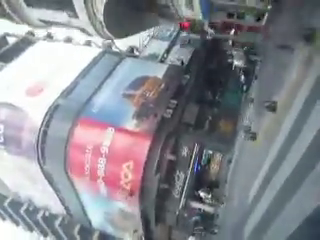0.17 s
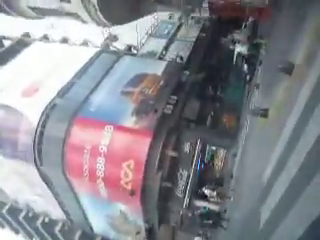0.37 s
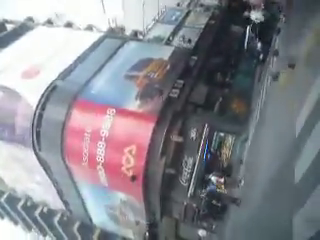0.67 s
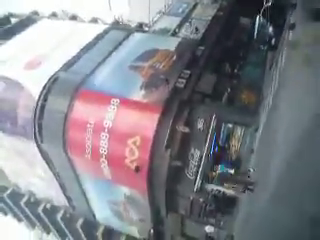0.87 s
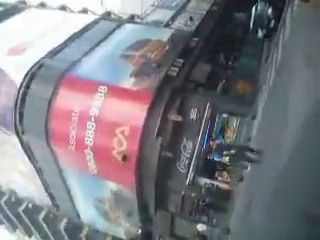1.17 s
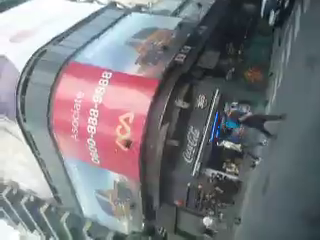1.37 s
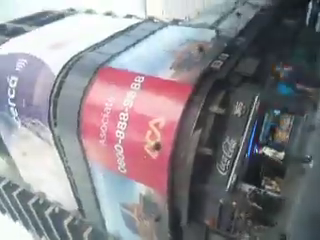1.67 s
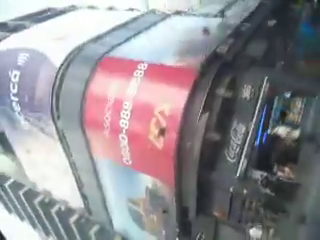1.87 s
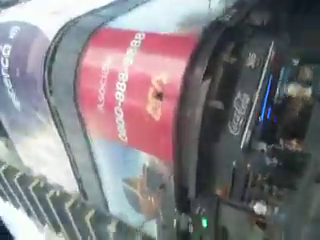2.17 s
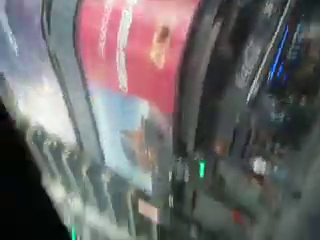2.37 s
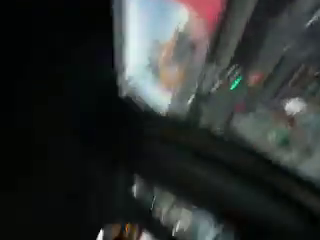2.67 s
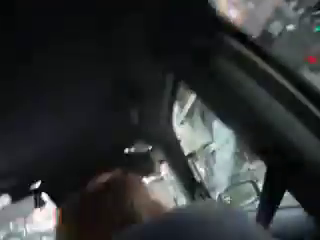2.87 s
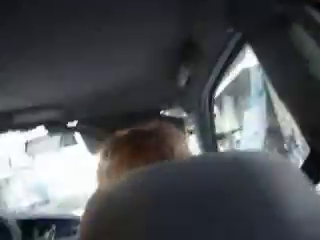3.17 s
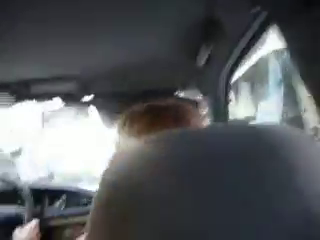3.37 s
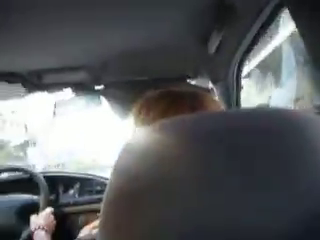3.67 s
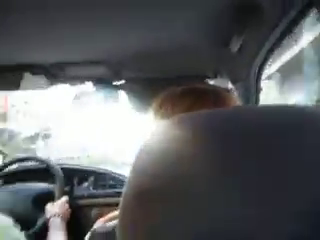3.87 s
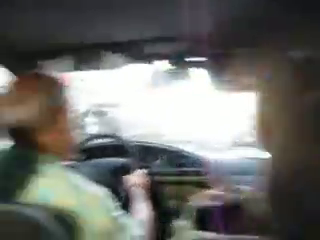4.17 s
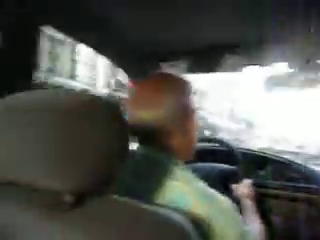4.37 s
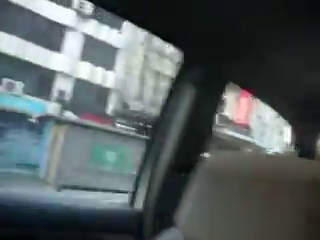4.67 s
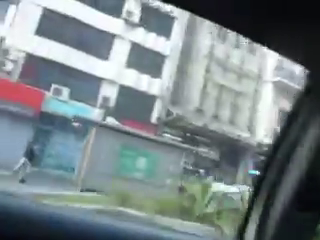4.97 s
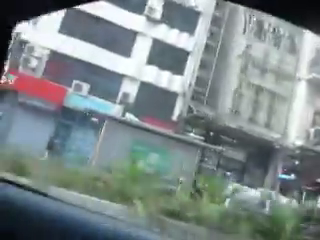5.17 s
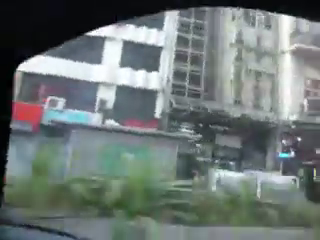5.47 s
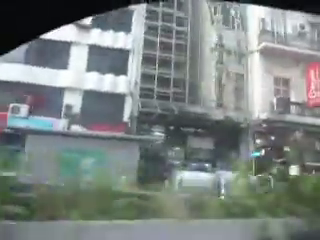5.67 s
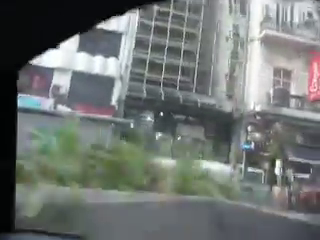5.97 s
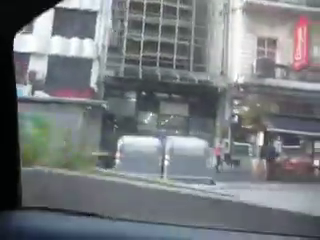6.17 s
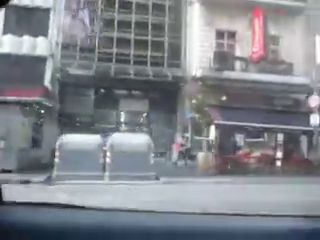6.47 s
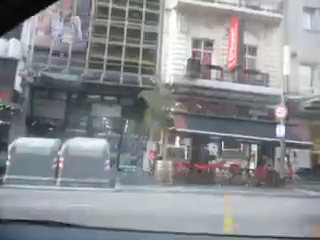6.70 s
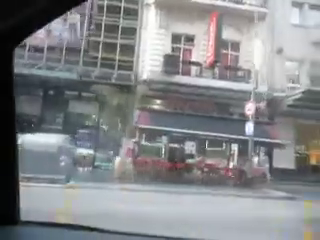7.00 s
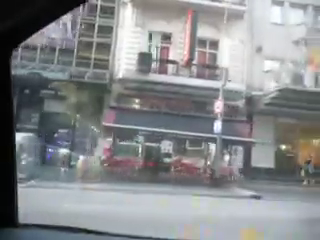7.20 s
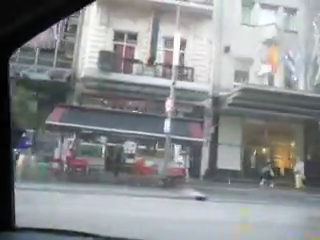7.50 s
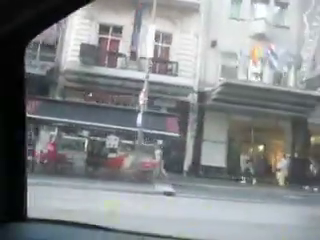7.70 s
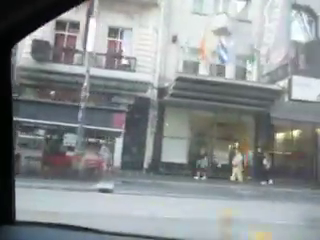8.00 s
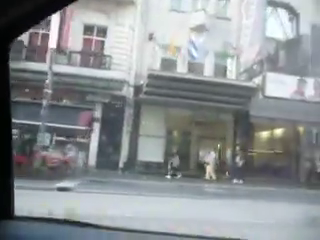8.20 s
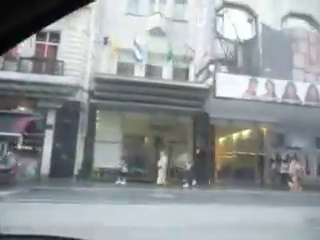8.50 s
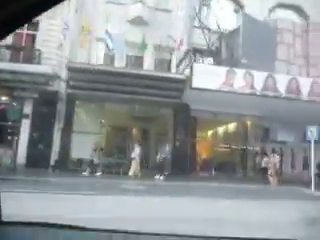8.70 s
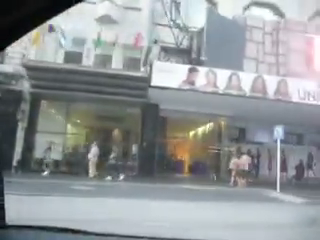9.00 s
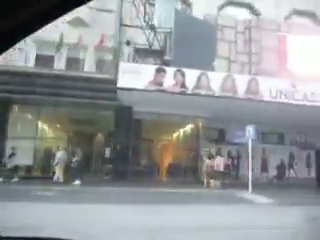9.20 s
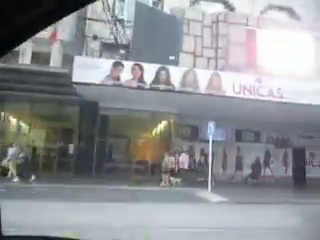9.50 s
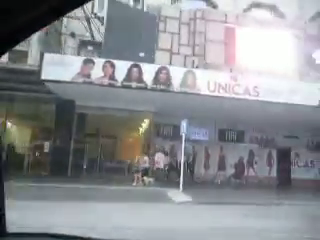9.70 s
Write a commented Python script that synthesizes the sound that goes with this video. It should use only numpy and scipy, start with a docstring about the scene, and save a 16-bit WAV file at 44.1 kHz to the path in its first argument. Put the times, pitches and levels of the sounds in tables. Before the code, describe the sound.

Inside a car on a city avenue, the engine booms up and eases, road rumbles, fingers rub the microphone, then bumps thud underneath.

```python
"""Back seat of a car rolling along a city avenue, heard by a small hand-held camera.
The engine booms up and eases off, built from sine waves at multiples of its firing rate.
Coloured noise makes the road's rumble, the tyres' rush and the wind; ringing tones make thuds and knocks.
The sound cuts out twice. Fingers rub and tap on the camera, mostly as it is swung to the other window."""
import sys
import numpy as np
from scipy import signal
from scipy.fft import rfft, irfft, next_fast_len
from scipy.io import wavfile
from scipy.ndimage import uniform_filter1d

SR = 44100
rng = np.random.default_rng(int(sys.argv[2]) if len(sys.argv) > 2 else 0)


def master(y):
    """Save y as 16-bit WAV."""
    cut = np.clip(np.atleast_2d(y).T, -1, 1)
    pcm = np.round(cut * 32767)  # scale
    wavfile.write(sys.argv[1], SR, pcm.astype(np.int16))


N = 434385


def from_db(db):
    """Turn decibels into a gain."""
    return 10 ** (np.asarray(db) / 20)


def rms_one(x):
    """Scale a sound to an rms (average strength) of 1."""
    return x / np.sqrt(np.mean(x ** 2) + 1e-20)


def in_time(rows):
    """Draw each column of a timed table as a curve with a value at every sample."""
    s, *columns = np.transpose(rows)
    return [np.interp(np.arange(N) / SR, s, column) for column in columns]


def swing(curve):
    """A level curve in dB, moved so that its mean is 0."""
    db, = in_time(curve)
    return db - db.mean()


def ramp(start_s, takes_s):
    """A smooth move from 0 to 1."""
    progress = np.clip((np.arange(N) / SR - start_s) / takes_s, 0, 1)
    return np.sin(np.pi / 2 * progress) ** 2


def drift(rate):
    """A random wander of spread 1, heading for a new value `rate` times a second."""
    knots = rng.standard_normal(2000)
    return rms_one(np.interp(np.arange(N) / SR * rate, np.arange(len(knots)), knots))


def bins(size):
    """Frequencies in the spectrum of that many samples, kept above zero."""
    return np.maximum(np.fft.rfftfreq(size, 1 / SR), 1)


def colour(x, spectrum):
    """Filter a sound by a curve of dB over pitch."""
    hz, db = np.transpose(spectrum)
    curve_db = np.interp(np.log(bins(len(x))), np.log(hz), db)
    return irfft(rfft(x) * from_db(curve_db), len(x))


def noise(spectrum):
    """Noise of the given colour, rms 1."""
    white = rng.standard_normal(next_fast_len(N))
    return rms_one(colour(white, spectrum)[:N])


def bell(hz, centre_hz, octaves):
    """A bell-shaped weight over pitch."""
    return np.exp(-(np.log2(hz / centre_hz) / octaves) ** 2 / 4)


def hump(x, centre_hz, octaves):
    """Keep a bell-shaped range of pitch."""
    return irfft(rfft(x) * bell(bins(len(x)), centre_hz, octaves), len(x))


def soften(x, hz):
    """Gently dull a sound above a pitch (one-pole low-pass)."""
    r = np.exp(-2 * np.pi * hz / SR)
    return signal.lfilter([1 - r], [1, -r], x)


def resonate(x, hz, width_hz):
    """A resonance with gain 1 at its top."""
    r = np.exp(-np.pi * width_hz / SR)
    feed = np.array([1, 0, -1]) * (1 - r * r) / 2
    return signal.lfilter(feed, [1, -2 * r * np.cos(2 * np.pi * hz / SR), r * r], x)


def struck(t, rise_s, t60):
    """A quick rise times a steady decay that falls 60 dB in t60 seconds."""
    return (1 - np.exp(-t / rise_s)) * from_db(-60 * t / t60)


def add(out, s, sound):
    """Mix a sound in at a time in seconds."""
    at = max(round(s * SR), 0)
    out[at:at + len(sound)] += sound[:N - at]


# when the camera leaves the first window and nears the other one, and how long each move takes (s)
LEAVES_S, LEAVE_TAKES_S, RETURNS_S, RETURN_TAKES_S = 2.85, 0.11, 4.26, 0.62


def place(inside_db, far_db):
    """Change in dB against the first window, as the camera goes inside and then to the other window."""
    go_inside = inside_db * ramp(LEAVES_S, LEAVE_TAKES_S)
    go_across = (far_db - inside_db) * ramp(RETURNS_S, RETURN_TAKES_S)
    return go_inside + go_across


# The engine's firing rate as it revs up, eases off and settles. Each row: time in seconds, rate in Hz.
REVS = [(0, 38.6), (0.5, 44.4), (1.03, 50.56), (1.79, 56.75), (2.0, 54.97), (2.82, 47.3), (3.2, 45.95),
        (4.6, 44.83), (5.5, 35.93), (8.6, 39.8), (9.85, 37.12)]
# How loudly the cabin booms with the engine. Each row: time in seconds, level in dB.
BOOM = [(0, -36.5), (0.8, -34), (1.2, -26), (1.75, -23.5), (2.05, -25.5), (2.8, -29), (3.1, -38.5),
        (4.3, -45), (4.8, -35), (5.35, -36.5), (5.85, -36), (6.25, -35.5), (6.6, -43.5), (7.7, -42),
        (8.2, -33.5), (8.7, -28), (9.85, -35.5)]
# The first multiples of the firing rate, lowest first. Each entry: level in dB against the boom.
ORDERS_DB = [0, -7, -16.5, -17.5]


def engine(waver_db=0.5):
    """Sines at the firing rate and its multiples make the cabin boom, each wavering a little."""
    turn = 2 * np.pi * np.cumsum(in_time(REVS)[0]) / SR
    orders = np.zeros(N)
    for multiple, db in enumerate(ORDERS_DB, start=1):
        orders += from_db(db + waver_db * drift(6.1)) * np.sin(multiple * turn)
    return from_db(in_time(BOOM)[0]) * np.sqrt(2) * orders  # the root gives a sine an rms of 1


# Roughness of the asphalt, as the level of its rumble. Each row: time in seconds, level in dB.
ROUGHNESS = [(0, -24), (0.5, -24), (0.8, -31), (1.15, -27.5), (1.7, -27), (2.05, -33), (2.6, -25),
             (2.85, -25.5), (2.97, -30), (3.9, -30), (4.25, -33.5), (5.3, -23.5), (6, -24.5), (7.3, -22.5),
             (7.95, -26.5), (8.3, -23.5), (8.7, -26.5), (9.3, -24.5), (9.85, -22.5)]


def road(uneven_db=1.0):
    """Uneven asphalt shakes the body and makes the tyres rush; both waver together."""
    return from_db(uneven_db * drift(14)) * (body_rumble() + tyre_rush())


# Colour of the road's deep rumble. Each row: pitch in Hz, relative level in dB per Hz.
ROAD = [(45, -18.5), (65, -1.5), (80, 4.5), (100, -1.5), (138, 1), (165, -5.5), (210, -24), (400, -45.5),
        (900, -79.5)]
# Colour of the cabin's drone. Each row: pitch in Hz, relative level in dB per Hz.
DRONE = [(120, -24.5), (155, -1.5), (172, -5), (195, -2.5), (222, -6), (252, -6), (285, -9.5), (340, -15.5),
         (480, -33), (900, -62.5)]
# the drone's middle level (dB), and the shares of the road's and the boom's swing that it follows
DRONE_DB, DRONE_FOLLOWS_ROAD, DRONE_FOLLOWS_BOOM = -34, 0.52, 0.21


def body_rumble(flutter_db=-0.5):
    """The rough road shakes a deep rumble out of the body, with a fluttering cabin drone above it."""
    rumble = from_db(in_time(ROUGHNESS)[0]) * noise(ROAD)
    drone_db = DRONE_DB + DRONE_FOLLOWS_ROAD * swing(ROUGHNESS) + DRONE_FOLLOWS_BOOM * swing(BOOM)
    drone_db += place(inside_db=-2.5, far_db=-1.5)
    return rumble + from_db(drone_db + flutter_db * drift(22)) * noise(DRONE)


# the tyres' starting level on an average road (dB), their share of the road's swing, and their growth
TYRE_DB, TYRE_FOLLOWS_ROAD, TYRE_RISE_DB_PER_S = -44.5, 0.28, 0.0882


def tyre_level():
    """Level in dB: louder on rough asphalt, as the car gathers speed, and near a window."""
    gathering_speed = TYRE_RISE_DB_PER_S * np.arange(N) / SR
    near_window = place(inside_db=-2.5, far_db=0.95)
    return TYRE_DB + TYRE_FOLLOWS_ROAD * swing(ROUGHNESS) + gathering_speed + near_window


# Colour of the tyres' rush. Each row: pitch in Hz, relative level in dB per Hz.
TYRES = [(150, -12), (300, 1), (400, 3), (480, 0), (600, -7), (760, -8.5), (930, -12), (1120, -18.5),
         (1350, -21), (1600, -24), (2100, -30), (3000, -34.5), (5000, -42), (8000, -68.5)]
# Colour of a swish that joins at speed. Each row: pitch in Hz, relative level in dB per Hz.
SWISH = [(150, -13), (280, 5.5), (750, -4.5), (1350, -16), (2500, -33), (6000, -41)]
# when the tread's song and the swish begin, and how long each takes to come in (s)
TREAD_FROM_S, TREAD_FADE_S = 7, 1.3
SWISH_FROM_S, SWISH_FADE_S = 7.46, 2.4


def tyre_rush(grit_db=1.5, sing_hz=940, sing_width_hz=150, sing_db=-13, swish_db=-0.5):
    """Tyres rush as gritty noise; at speed the tread sings through a resonance and a swish joins in."""
    song_noise = noise([(500, -1.0), (900, 0.0), (1500, -42.5)])
    song = rms_one(resonate(song_noise, sing_hz, sing_width_hz))
    tread = ramp(TREAD_FROM_S, TREAD_FADE_S) * from_db(sing_db) * song
    swish = ramp(SWISH_FROM_S, SWISH_FADE_S) * from_db(swish_db) * noise(SWISH)
    return from_db(tyre_level() + grit_db * drift(60)) * (noise(TYRES) + tread + swish)


# Thuds of wheels and body over joints. Each row: start in seconds, strength in dB, centre pitch in Hz,
# spread in octaves, rise in seconds, time to fall by 60 dB in seconds.
THUDS = [(1.697, -28, 400, .4, .003, 0.095), (4.365, -29.5, 400, .55, .002, .09),
         (4.77, -26.5, 400, 0.58, 0.0022, .11), (5.365, -25, 240, .5, 0.0071, 0.13),
         (5.41, -16, 265, 0.23, 0.0049, .16), (5.471, -28, 250, .3, 0.0043, 0.16),
         (5.709, -19, 320, .45, 0.0017, 0.083), (5.725, -23, 400, .4, 0.0018, 0.055),
         (5.811, -21, 270, .3, 0.0025, 0.13), (6.48, -27.5, 480, .5, .003, 0.14),
         (7.427, -22, 370, 0.46, 0.0026, .15), (7.459, -24, 275, .25, 0.0021, .1),
         (7.668, -25, 380, .45, 0.0031, .13), (8.138, -18, 350, .6, 0.002, 0.15),
         (8.9, -23, 430, .45, 0.0024, .1), (9.447, -29.5, 435, .36, .003, 0.095)]
# Resonances of the suspension and body shell. Each row: pitch in Hz, relative level in dB.
SHELL = [(254.8, -1), (282, 0.5), (392.3, 2), (445, -7.5), (530, -15.5)]


def thuds(rough=0.41, detune=0.012):
    """A joint in the road shoves the shell, which rings and dies away; each shove favours its own pitches."""
    out, t = np.zeros(N), np.arange(8192) / SR
    for s, db, centre_hz, spread, rise_s, t60 in THUDS:
        ring = np.zeros(len(t))
        for hz, mode_db in SHELL:
            detuned_hz = hz * (1 + detune * rng.standard_normal())
            ring += from_db(mode_db) * bell(hz, centre_hz, spread) * np.sin(2 * np.pi * detuned_hz * t)
        crunch = rms_one(hump(rng.standard_normal(len(t)), centre_hz, spread))
        shake = rms_one(ring) + rough * crunch
        add(out, s, from_db(db) * struck(t, rise_s, t60) * shake / np.sqrt(2))
    return out


# Jolts that knock loose panels. Each row: start in seconds, strength in dB, note in Hz.
KNOCKS = [(1.701, -29.5, 583), (4.352, -33, 668), (4.757, -25, 690), (4.779, -30, 640), (5.013, -30, 700),
          (5.278, -31, 550), (5.709, -27, 683), (6.444, -28, 557), (7.393, -44, 780), (7.43, -28, 690),
          (8.141, -33, 663), (8.258, -32, 840), (8.664, -29.5, 766), (8.961, -29.5, 584),
          (9.224, -30.5, 646), (9.546, -43, 622)]


def panel_knocks(attack_s=0.0035, ring_t60_s=0.048, rough=0.34):
    """The sharper jolts knock loose panels, each giving a short, rough, hollow note."""
    out, t = np.zeros(N), np.arange(8192) / SR
    for s, db, hz in KNOCKS:
        roughness = rms_one(hump(rng.standard_normal(len(t)), hz, octaves=0.24))
        note = np.sin(2 * np.pi * hz * t) + rough * roughness
        add(out, s, from_db(db) * struck(t, attack_s, ring_t60_s) * note)
    return out


# Taps on the camera case. Each row: start in seconds, strength in dB, hardness as a top pitch in Hz,
# freedom to ring from 0 to 1, low thump as a multiple of the tap's strength.
TAPS = [(0.356, -38, 2600, .7, 0), (3.426, -11.5, 3700, 1, .4), (3.5932, -27, 7000, 0.86, 0),
        (3.613, -34, 8000, .6, 0), (3.635, -37, 9000, .6, 0), (3.7118, -26.5, 6000, .6, 0),
        (3.721, -19, 12000, 0.4, 0), (3.7362, -28, 9000, .6, 0), (3.748, -25.5, 950, .7, 1.2),
        (3.8456, -20.5, 3600, 0.4, 1.5), (3.8577, -25, 2600, 0.6, 2.2), (3.868, -26, 3200, 0.5, 1.8),
        (3.8839, -30, 900, .6, 3.5), (3.8958, -25, 900, 0.6, 2.6), (3.9055, -27, 2200, 0.5, 1.8),
        (3.9134, -32, 2600, .6, 1.5), (3.924, -29, 2200, .6, 1.5), (3.9616, -28, 2200, .6, 0),
        (3.965, -9.5, 1150, 0.78, .5), (4.168, -41, 5000, 0.6, 0), (4.6493, -41, 4503, .7, 0),
        (4.718, -39, 3500, 0.7, 0), (4.838, -36.5, 4000, 0.5, 0), (4.854, -34.5, 3800, .6, 0),
        (5.008, -34, 2600, .7, 0), (5.0176, -28, 3200, 0.75, .8), (5.036, -24, 2600, 0.6, .9),
        (6.423, -28, 5500, .6, 0)]
# Ways the case rings. Each row: pitch in Hz, relative level in dB, time to fall by 60 dB in seconds.
CASE = [(470, -17, 0.006), (920, 2, 0.0067), (986, -11, 0.037), (1240, -10.5, 0.011), (1980, -6, 0.0065),
        (2540, -5, 0.0057), (3300, -14, 0.0065), (3880, -14, 0.0078), (5400, -12.5, 0.0029)]


def taps(skin_hz=6000, low_cut_hz=300, thump_hz=170, thump_t60=0.013, choke_s=0.00026):
    """A touch rings the small case: soft ones sound dull, a resting finger chokes it, a firm push thumps."""
    out, thumps, t = np.zeros(N), np.zeros(N), np.arange(SR // 20) / SR
    thump = from_db(-60 * t / thump_t60) * np.sin(2 * np.pi * thump_hz * t)
    for s, db, hardness_hz, free, push in TAPS:
        rings = np.zeros(len(t))
        for hz, mode_db, t60 in CASE:
            ring_db = mode_db + .5 * rng.standard_normal() - 60 * t / t60
            rings += from_db(ring_db) * np.sin(2 * np.pi * hz * t)
        choke = np.exp(-max(1 - free, 0) * t / choke_s)
        contact = signal.butter(2, min(hardness_hz, SR / np.pi), fs=SR)
        add(out, s, from_db(db) * signal.lfilter(*contact, rings * choke))
        add(thumps, s, from_db(db) * push * thump / thump.max())
    out = soften(out + 1e-18, skin_hz)
    return out - soften(out, low_cut_hz) + thumps  # taking away the lows leaves the click


# Fingers sliding on the camera. Each row: start in seconds, length in seconds, level in dB,
# centre pitch in Hz, spread in octaves, pressing in and lifting off in seconds, graininess in dB.
RUBS = [(1.118, .025, -63, 2900, 0.58, .008, .012, 7), (2.48, .025, -64, 2200, 0.13, 0.009, .012, -1),
        (3.074, 0.021, -45, 760, 0.53, 0.0016, 0.017, 4), (3.111, 0.27, -48, 940, 0.42, 0.056, .04, 1),
        (3.166, 0.19, -55.5, 2830, 0.33, 0.038, 0.019, 3.5),
        (3.183, 0.18, -53.5, 2230, 0.17, 0.056, .02, 4), (3.279, .065, -62, 3300, 0.18, .035, 0.018, 2),
        (3.183, 0.095, -67, 6200, 0.3, .02, .06, 4), (3.337, 0.026, -41.5, 910, 0.19, 0.011, 0.0098, 5),
        (3.355, 0.12, -45.5, 880, 0.47, 0.017, .01, 3), (3.424, 0.21, -49.5, 2530, 0.61, 0.0036, 0.16, -2),
        (3.478, 0.087, -70, 6540, 0.17, .025, .025, 4), (3.494, 0.04, -40.5, 820, 0.6, 0.0027, 0.034, 6.5),
        (3.598, 0.12, -49.5, 1730, 0.79, 0.094, 0.012, 0),
        (3.702, 0.051, -39.5, 1900, 1.7, 0.011, 0.019, 2), (3.727, 0.14, -50, 4300, 1.26, 0.025, 0.028, 3),
        (3.751, 0.032, -52, 7140, 0.53, .012, 0.013, 4), (3.835, 0.076, -32, 1150, 1.4, 0.0075, 0.067, 2),
        (3.891, 0.058, -31.5, 860, 0.99, 0.0072, 0.029, 1), (3.948, 0.023, -40, 997, 0.95, 0.01, 0.005, 5),
        (3.966, 0.096, -54.5, 3780, 1, 0.0072, 0.025, 4), (3.989, 0.04, -62, 2550, .2, .012, .015, 4),
        (4.391, 0.22, -64.5, 1794, 0.55, 0.048, 0.077, -5), (4.95, 0.15, -56, 2300, 0.27, 0.08, 0.074, 7.5),
        (5.006, 0.022, -43, 720, 0.47, .008, .012, 2)]
# How the case passes rubbing on to the microphone. Each row: pitch in Hz, gain in dB.
CASE_COLOUR = [(100, 8), (250, 22), (600, 8.5), (800, 5), (1080, 3), (1560, -1.5), (2200, -4.5),
               (2800, -10.5), (3500, -12), (4400, -16.5), (5500, -15), (6800, -22), (8200, -20)]


def rubs(slips_per_s=1300, smooth=0.33, tremble_db=0.9):
    """Skin sticks and slips on plastic: dense uneven grains under a pressure that builds, trembles and lifts."""
    out, size = np.zeros(N), SR // 2
    tremble = from_db(tremble_db * drift(90))
    for s, length, db, centre_hz, octaves, press_s, lift_s, grain_db in RUBS:
        grain_sizes = from_db(grain_db * np.minimum(rng.exponential(1, size), 3))
        grains = grain_sizes * (rng.random(size) < slips_per_s / SR)
        slips = (grains + smooth) * rng.standard_normal(size)
        scrape = colour(hump(slips, centre_hz, octaves), CASE_COLOUR)[:int(length * SR)]
        t = np.arange(len(scrape)) / SR
        touch = np.clip(np.minimum(t / press_s, (length - t) / lift_s), 0, 1)
        pressure = np.sin(np.pi / 2 * touch) ** 2
        add(out, s, from_db(db) * rms_one(scrape * pressure))
    return out * tremble


# Colour of the air buffeting the microphone. Each row: pitch in Hz, relative level in dB per Hz.
AIR = [(8, -16), (22, 7.5), (30, 2), (45, 5), (58, 0), (75, -22.5), (150, -56)]


def wind(first_window_db=-38, gust_db=-1.0):
    """Lumpy, very low buffeting of air, weaker inside the cabin and strongest at the other window."""
    level_db = first_window_db + place(inside_db=-1.5, far_db=4.5)
    return from_db(level_db + gust_db * drift(2.3)) * noise(AIR)


def hollow(hz=192, width_hz=26.8, level_db=-33, drop_db=-12.5, follows_road=0.25):
    """The road stirs one air resonance of the cabin; it sinks once the camera leaves the first window."""
    hum = resonate(resonate(rng.standard_normal(N), hz, width_hz), hz, width_hz)
    leaving_db = drop_db * ramp(LEAVES_S, LEAVE_TAKES_S)
    return from_db(level_db + follows_road * swing(ROUGHNESS) + leaving_db) * rms_one(hum)


def shell_hum(level_db=-45.5, width_hz=14, follows_road=0.4):
    """The road keeps the lowest resonance of the body shell humming."""
    hz = SHELL[0][0]
    hum = resonate(resonate(rng.standard_normal(N), hz, width_hz), hz, width_hz)
    return from_db(level_db + follows_road * swing(ROUGHNESS)) * rms_one(hum)


# Resonances of loose cabin trim. Each row: pitch in Hz, width in Hz.
TRIM = [(680, 240), (1300, 190)]


def trim_rattle(per_s=14, level_db=-19, size_db=4.0):
    """Padded trim knocks dully at random, its level following the tyres (level_db is against theirs)."""
    out = np.zeros(N)
    for hz, width_hz in TRIM:
        sizes = from_db(size_db * np.minimum(rng.exponential(1, N), 3))
        knocks = (rng.random(N) < per_s / SR) * sizes
        out += resonate(resonate(knocks + 1e-18, hz, width_hz), hz, width_hz) / hz ** 2
    return from_db(tyre_level() + level_db) * rms_one(out)


# Ticks of small cabin fittings. Each row: start in seconds, strength in dB, pitch in Hz.
TICKS = [(0.128, -34.5, 760), (0.13, -52, 2000), (0.293, -50, 1170), (0.356, -44, 1430), (0.444, -51, 2200),
         (1.327, -46, 1080), (1.566, -47, 1080), (2.171, -56, 2200)]


def trim_ticks(attack_s=0.0002, t60=0.033):
    """Small plastic fittings tick, each a sine at its own pitch that dies away quickly."""
    out, t = np.zeros(N), np.arange(SR // 10) / SR
    for s, db, hz in TICKS:
        add(out, s, from_db(db) * struck(t, attack_s, t60) * np.sin(2 * np.pi * hz * t))
    return out


# Colour of the camera's hiss. Each row: pitch in Hz, relative level in dB per Hz.
HISS = [(500, 8), (2000, 9.5), (3700, 0.5), (4400, -7), (5500, 0.5), (6500, 1), (7300, -15), (8200, -20.5)]
# The camera's faint whines. Each row: pitch in Hz, level in dB.
WHINES = [(3555.6, -86), (6222.2, -90), (6666.6, -83)]


def electronics(hiss_db=-67.5):
    """The camera's electronics give a steady noise hiss and thin sine whines."""
    t = np.arange(N) / SR
    whines = sum(from_db(db) * np.sqrt(2) * np.sin(2 * np.pi * hz * t) for hz, db in WHINES)
    return from_db(hiss_db) * noise(HISS) + whines


def scene():
    """Everything that reaches the one microphone."""
    car = engine() + road() + thuds() + panel_knocks()
    cabin = hollow() + shell_hum() + trim_rattle() + trim_ticks()
    camera = taps() + rubs() + wind() + electronics()
    return (car + cabin + camera)[None]


# Gaps where the sound cuts out. Each row: start in seconds, end in seconds.
DROPOUTS = [(1.815, 1.955), (2.848, 2.988)]
# Pops as it breaks off and returns. Each row: start in seconds, strength in dB.
POPS = [(1.8147, -17.5), (1.955, -34), (2.848, -26.5), (2.988, -54)]


def record(dry, idle_db=-73, pop_s=0.00073, offset=0.024, cutoff_hz=8576):
    """The sound breaks off twice with pops, leaving faint hiss; the top is cut and a small offset added."""
    live, pops = np.ones(N), np.zeros(N)
    for start, end in DROPOUTS:
        live[round(start * SR):round(end * SR)] = 0
    for s, db in POPS:
        add(pops, s, from_db(db) * np.exp(-np.arange(SR // 20) / SR / pop_s))
    idle = from_db(idle_db) * noise([(100, 8.5), (1500, -2.0), (3500, -3), (7000, -5.5), (8500, -17.0)])
    gated = dry * uniform_filter1d(live, size=90)  # the averaging rounds off the edges of each gap
    sound = (gated + pops + idle) * signal.windows.tukey(N, .0006)
    # from the cutoff upwards everything is at least 50 dB down
    top_cut = signal.cheby2(12, 50, cutoff_hz, fs=SR, output="sos")
    return signal.sosfilt(top_cut, sound) + offset


dry = scene()
out = record(dry)
master(out)
```